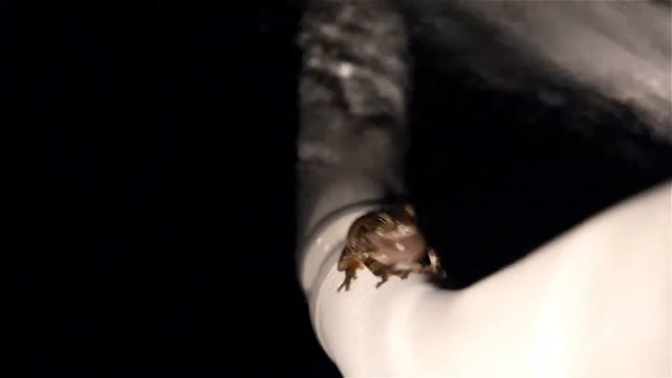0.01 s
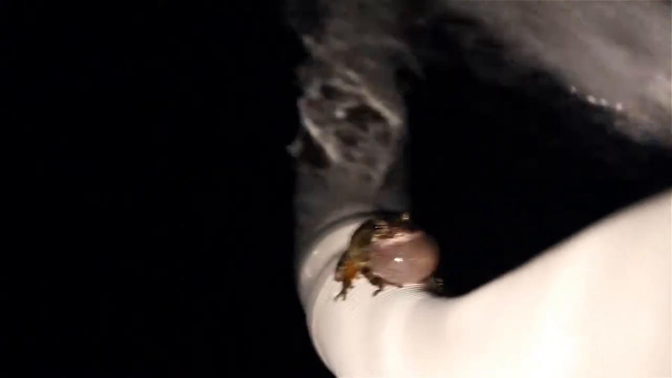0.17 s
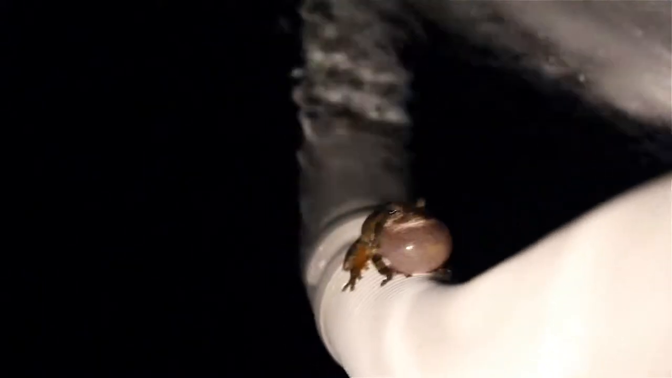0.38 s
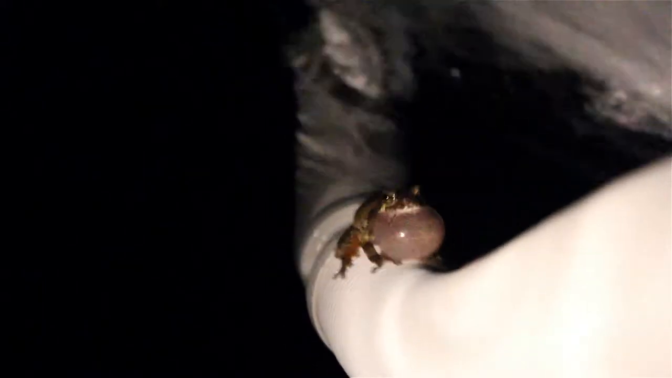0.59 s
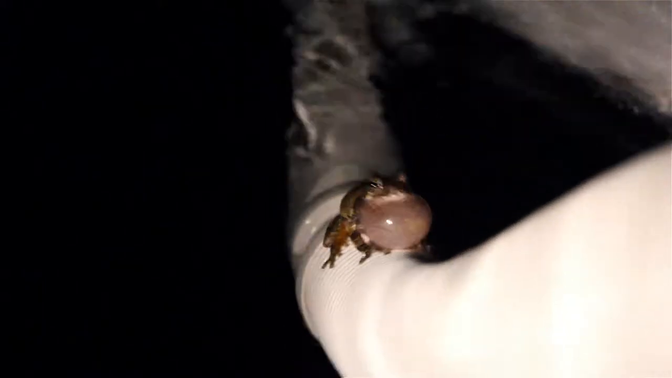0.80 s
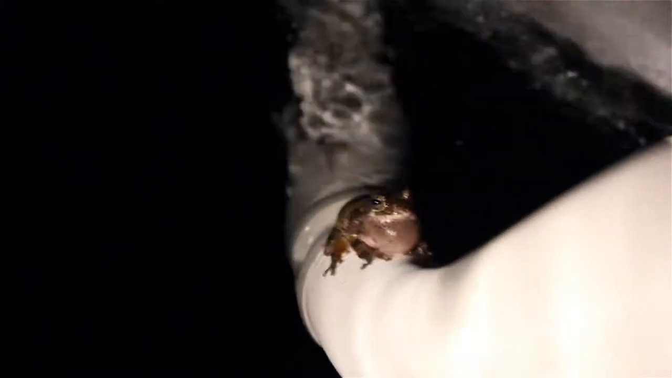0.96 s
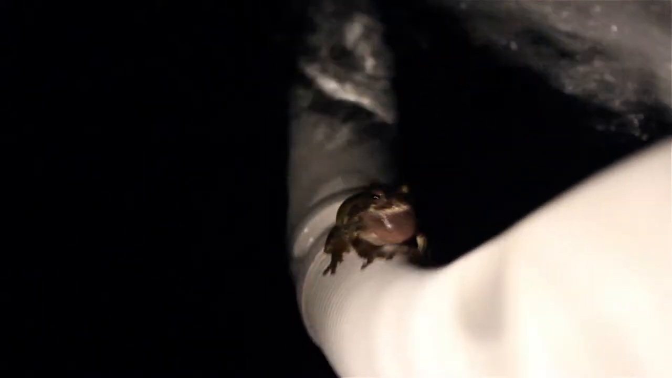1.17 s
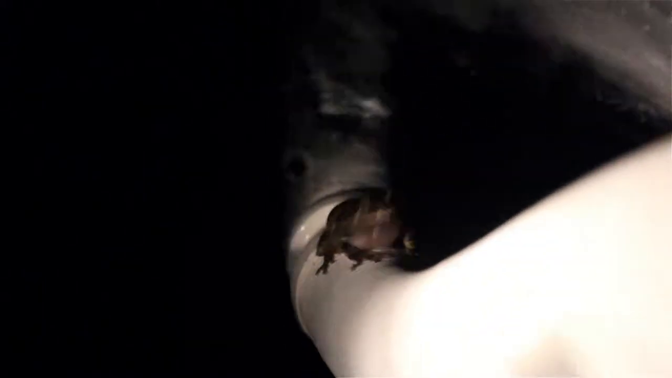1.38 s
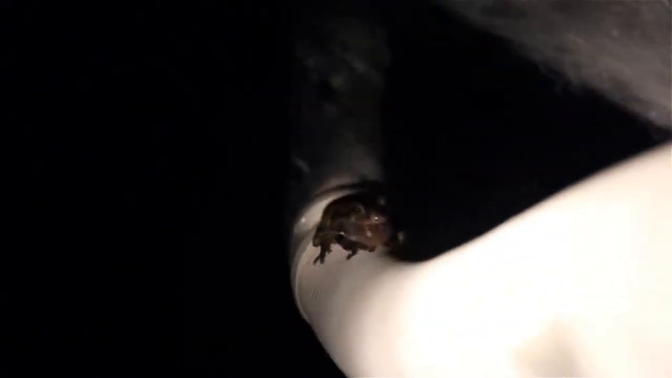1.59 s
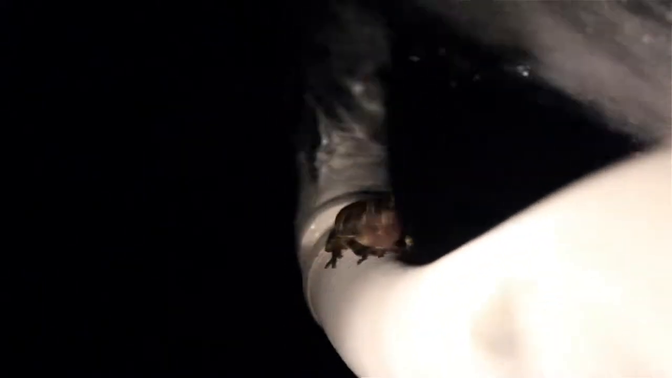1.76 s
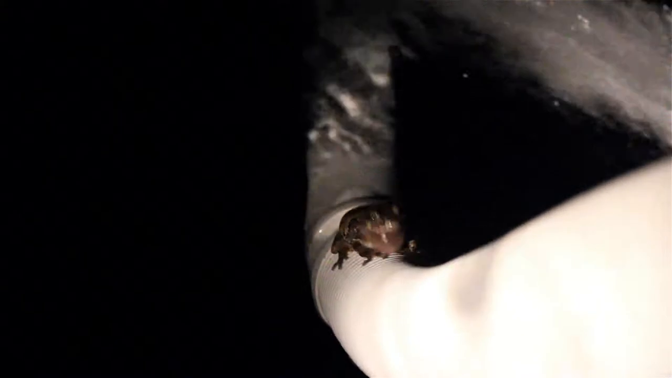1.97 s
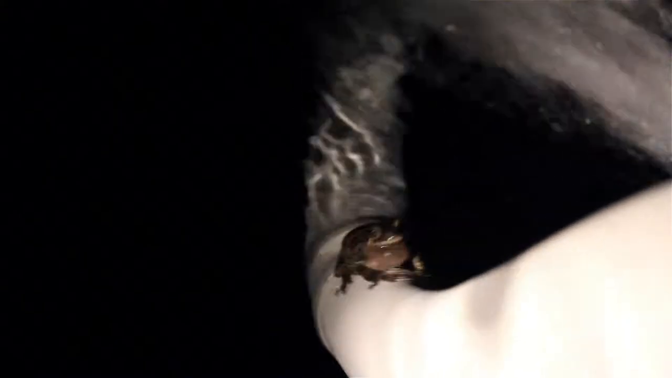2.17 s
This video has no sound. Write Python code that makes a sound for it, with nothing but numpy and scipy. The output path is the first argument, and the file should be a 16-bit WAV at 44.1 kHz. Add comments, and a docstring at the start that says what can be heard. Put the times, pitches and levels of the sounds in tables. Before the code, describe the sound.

Outdoors at night, two tree frogs' croaks overlap: a fainter, slower doubled rattle begins, a bright close trill bursts over it and stops first, leaving soft hiss, low hum, light ticks and hollow taps.

```python
"""Outdoors at night, a tree frog close to the microphone gives one rattling croak over hiss and a faint low hum.
Its croak is a train of about 48 short rising chirps a second, strongest at the octave: harmonics swept
through the resonance of a vocal sac. A second frog farther off starts earlier and ends later, with slower,
doubled pulses. Body resonances and short echoes draw both out. The night is shaped noise and sine tones;
soft knocks are decaying sines with a puff of noise, and ticks are brief bands of noise."""
import sys
import numpy as np
from scipy import signal
from scipy.fft import rfft, irfft, next_fast_len
from scipy.io import wavfile
from scipy.ndimage import uniform_filter1d, map_coordinates

SR = 44100
rng = np.random.default_rng(int(sys.argv[2]) if len(sys.argv) > 2 else 0)


def output_pcm(signal):
    """Save a mono or channel-first signal as 16-bit PCM at the path in sys.argv[1].

    Samples are clipped to [-1, 1] before scaling.
    """
    pcm = np.clip(np.atleast_2d(signal).T, -1, 1) * 32767
    wavfile.write(sys.argv[1], SR, np.round(pcm).astype(np.int16))


N = 97020  # samples: 2.2 s


def amp(db):
    """Decibels to gain."""
    return 10 ** (np.asarray(db) / 20)


def unit(x):
    """Scale to rms 1."""
    return x / np.sqrt(np.mean(x ** 2) + 1e-20)


def along(points, hz):
    """Read a curve of (Hz, value) points on a log frequency axis."""
    point_hz, value = np.transpose(points)
    return np.interp(np.log(hz + 1), np.log(point_hz + 1), value)


def wobble(rate):
    """A smooth random curve with rate knots a second."""
    knots = rng.standard_normal(int(N * rate / SR) + 4)
    return map_coordinates(knots, [np.arange(N) * rate / SR])


def filtered(x, response):
    """Multiply the spectrum of x by a response of frequency."""
    size = next_fast_len(len(x) + SR // 4)
    spectrum = rfft(x, size) * response(np.fft.rfftfreq(size, 1 / SR))
    return irfft(spectrum, size)[:len(x)]


def add(track, start, sound):
    """Mix a sound into the track from a start sample on."""
    part = track[start:start + len(sound)]
    part += sound[:len(part)]


# Colour of the hiss. Each row: frequency in Hz, relative density in dB per Hz.
AIR = [(25, -29), (40, -24), (64, -14), (95, -17), (125, -12), (150, -12), (215, -6.5), (270, -7.5),
       (390, -10.5), (470, -7.5), (590, -1.5), (1060, -4.5), (1630, -2), (2300, -7), (3380, -7),
       (4700, -12), (7000, -18.5), (10500, -24), (14500, -26.5), (15700, -24.5)]
# Loudness of the hiss. Each row: time in seconds, rms level in dB.
AIR_LEVEL = [(0, -39), (.2, -39), (1.35, -39), (1.7, -39.5), (2.2, -39.5)]
# Tones of the hum. Each row: frequency in Hz, rms level in dB.
HUM = [(120, -62.5), (294, -59.5), (360, -71), (419, -63.5)]


def night(patchy_db, waver):
    """Noise with slight patches in time and pitch makes the hiss; sines with a drifting phase make the hum."""
    t = np.arange(N) / SR
    cells = signal.stft(rng.standard_normal(N), nperseg=512)[2]
    patches = uniform_filter1d(rng.standard_normal(cells.shape), size=8, axis=0)  # across pitch
    patches = uniform_filter1d(patches, size=5, axis=1)  # across time
    hiss = signal.istft(cells * amp(patchy_db * unit(patches)), nperseg=512)[1][:N]
    hiss = unit(filtered(hiss, lambda hz: amp(along(AIR, hz))))
    hiss *= amp(np.interp(t, *np.transpose(AIR_LEVEL)))
    hum = np.zeros(N)
    for hz, db in HUM:
        phase = 2 * np.pi * hz * t + waver * wobble(6.1)
        hum += np.sqrt(2) * amp(db) * np.sin(phase)
    return hiss + hum


def puff(hz, width, size):
    """A band of noise at rms 1: a bell around hz, width in octaves."""
    noise = rng.standard_normal(size)
    return unit(filtered(noise, lambda f: np.exp(-.5 * (np.log2((f + 1) / hz) / width) ** 2)))


# Soft hollow knocks.
# Each row: start in seconds, level in dB before a doubling of gain, pitch in Hz, 60 dB decay in seconds.
KNOCKS = [(.035, -35.5, 705, 0.036), (1.131, -35, 566, 0.062), (1.159, -32.5, 556, 0.067),
          (1.266, -35, 1410, 0.026), (1.478, -28.5, 1550, 0.024), (1.76, -40, 556, 0.15)]
KNOCK_RISE_S, KNOCK_PUFF_DB, KNOCK_WIDTH = 0.0032, -6.5, 0.37  # width in octaves


def knocks():
    """Each knock is one decaying mode with a slightly higher puff of noise."""
    out, t = np.zeros(N), np.arange(SR // 6) / SR
    for s, db, hz, t60 in KNOCKS:
        body = np.sin(2 * np.pi * hz * t) + amp(KNOCK_PUFF_DB) * puff(1.22 * hz, KNOCK_WIDTH, len(t))
        envelope = amp(db - 60 * t / t60) * (1 - np.exp(-t / KNOCK_RISE_S))
        add(out, round(s * SR), envelope * body * 2)
    return out


# Faint ticks. Each row: start in seconds, level in dB, centre in Hz.
TICKS = [(.259, -42, 14300), (.615, -36, 15000), (.634, -35, 6550), (.652, -37, 12000), (1.132, -28, 2480),
         (1.46, -37, 7700), (1.714, -31.5, 4200), (1.821, -38, 10500), (1.855, -33, 5160),
         (1.884, -44, 12500), (1.991, -32.5, 5600), (2.002, -40, 9500), (2.072, -33.5, 3300)]
TICK_RISE_S, TICK_T60_S, TICK_WIDTH = 0.0014, 0.02, 0.19  # width in octaves
CRACKLE_PER_S, CRACKLE_DB, CRACKLE_SPREAD_DB, CRACKLE_HZ = 22, -45, 2.5, 9000


def ticks_and_crackle():
    """Placed ticks are short bands of noise; a crackle of fainter, broader ones falls at random moments."""
    out, t = np.zeros(N), np.arange(SR // 6) / SR
    envelope = amp(-60 * t / TICK_T60_S) * (1 - np.exp(-t / TICK_RISE_S))
    for s, db, hz in TICKS:
        add(out, round(s * SR), amp(db) * envelope * puff(hz, TICK_WIDTH, len(t)))
    for when, size, colour in rng.random((int(CRACKLE_PER_S * N / SR), 3)):
        hz = CRACKLE_HZ * 2 ** (colour - .5)  # half an octave either way
        gain = amp(CRACKLE_DB + CRACKLE_SPREAD_DB * size)
        add(out, int(when * N), gain * envelope * puff(hz, 2 * TICK_WIDTH, len(t)))
    return out


def pulse_times(rate):
    """A pulse falls whenever the running sum of the rate passes a whole number."""
    s, per_s = np.transpose(rate)
    t = np.arange(s[0], s[-1], 1 / SR)
    count = np.cumsum(np.interp(t, s, per_s)) / SR
    return np.interp(np.arange(int(count[-1]) + 1), count, t)


# What the vocal sac radiates. Each row: frequency in Hz, gain in dB.
SAC = [(1050, -18), (1250, -13), (1450, 3), (2100, -1), (2450, -1.5), (2750, -2), (3300, -34.5),
       (3800, -26.5), (4700, -35.5), (6000, -42), (7900, -43.5), (8400, -40.5), (9000, -48), (12000, -48)]
JITTER_S, SCATTER_DB, PITCH_SCATTER = .00005, 0.23, 0.008  # pulse to pulse; pitch as a fraction
ROUGH = 0.11  # depth of the fast random flutter in level
FLATNESS = 3.6  # how square the top of a pulse is (2 = bell)


def chirps(times, effort, attack, release, glide, bend, pitch=1, order=8):
    """Each pulse is a flat-topped upward glide whose harmonics sweep through the vocal sac."""
    s, level, hz, fundamental_db = np.transpose(effort)
    out = np.zeros(N)
    harmonic = np.arange(1, order + 1)[:, None]
    for at, chance in zip(times, rng.standard_normal((len(times), 3))):
        start = int((at - 2 * attack) * SR)
        samples = np.arange(int(2 * (attack + release) * SR))
        t = (start + samples) / SR - at - JITTER_S * chance[0]  # zero at mid-pulse
        middle_hz = pitch * np.interp(at, s, hz) * (1 + PITCH_SCATTER * chance[1])
        f = middle_hz * 2 ** (glide * t + bend * t * t)
        phase = 2 * np.pi * np.cumsum(f) / SR
        phase -= np.interp(0, t, phase)
        swell = np.exp(-np.abs(t / np.where(t < 0, attack, release)) ** FLATNESS)
        lift_db = (harmonic == 1) * np.interp(at, s, fundamental_db)
        partials = amp(along(SAC, harmonic * f) + lift_db) * np.sin(harmonic * phase)
        gain = amp(np.interp(at, s, level) + SCATTER_DB * chance[2])
        add(out, start, gain * swell * partials.sum(0))
    return out * (1 + ROUGH * wobble(900))


# Pace of the far croak. Each row: time in seconds, pulses a second.
FAR_RATE = [(.152, 49.3), (.25, 48.62), (.45, 46.65), (1.0, 44.29), (1.125, 41.99)]
# Effort through the far croak.
# Each row: time in seconds, level in dB, mid-pulse pitch in Hz before scatter and the twin's
# pitch ratio, lift of the fundamental in dB.
FAR_EFFORT = [(.152, -42.5, 1100, 22), (.19, -30.5, 1160, 13), (.22, -23.5, 1188, 6), (.35, -20, 1170, 2),
              (.7, -19.5, 1195, 0), (1.0, -20, 1195, 0.5), (1.11, -20, 1178, 1)]
# Shape of the first pulse: attack before its middle and release after it in seconds,
# glide in octaves a second, bend of the glide in octaves a second squared.
FAR_PULSE = dict(attack=0.0041, release=0.0032, glide=42.6, bend=1600)
# Shape of the twin: the same fields, and pitch as a ratio.
TWIN_PULSE = dict(attack=0.0038, release=0.0029, glide=17.4, bend=1800, pitch=0.97)
# The twin against the first pulse. Each row: time in seconds, relative level in dB.
DOUBLE_LEVEL = [(.2, -2.5), (1.0, 0.5)]
DOUBLE_S = .0093  # delay of the twin


def far_frog():
    """A softer train in which every pulse is followed by a flatter twin."""
    times = pulse_times(FAR_RATE)
    twin = chirps(times + DOUBLE_S, FAR_EFFORT, **TWIN_PULSE)
    twin_db = np.interp(np.arange(N) / SR, *np.transpose(DOUBLE_LEVEL))
    return chirps(times, FAR_EFFORT, **FAR_PULSE) + amp(twin_db) * twin


# Pace of the near croak. Each row: time in seconds, pulses a second.
NEAR_RATE = [(.274, 54.01), (.32, 50.05), (.55, 48.23), (.86, 47.41), (.905, 44.49), (.945, 32.35)]
# Effort through the near croak.
# Each row: time in seconds, level in dB, mid-pulse pitch in Hz before scatter, lift of the fundamental in dB.
NEAR_EFFORT = [(.274, -22, 1168, 5), (.315, -12.5, 1230, -2), (.37, -11.5, 1236, -2.5), (.55, -9, 1224, -3),
               (.615, -11.5, 1240, -1), (.645, -10, 1249, -4.5), (.68, -10, 1233, -1.5),
               (.78, -10.5, 1243, -3), (.84, -11, 1232, -1), (.94, -10.5, 1247, -1.5)]
# Shape of a pulse: attack before its middle and release after it in seconds,
# glide in octaves a second, bend of the glide in octaves a second squared.
NEAR_PULSE = dict(attack=.0034, release=0.003, glide=40.6, bend=2300)


def near_frog():
    """One loud train of single pulses that slows at its end."""
    return chirps(pulse_times(NEAR_RATE), NEAR_EFFORT, **NEAR_PULSE)


# Resonances that ring on after a pulse. Each row: frequency in Hz, width in Hz, level in dB.
RINGS = [(1189, 77, -12), (8530, 180, 10)]


def ringing(x):
    """Narrow resonances of the body draw out each pulse."""
    def response(f):
        return sum(amp(db) * 1j * f * width / (hz * hz - f * f + 1j * f * width) for hz, width, db in RINGS)
    return x + filtered(x, response)


# Echoes off nearby surfaces. Each row: frequency in Hz, 60 dB decay in seconds.
SPACE = [(500, .12), (1200, 0.17), (2400, 0.056), (8000, .05)]
# Loudness of the echoes. Each row: frequency in Hz, level in dB.
WET = [(500, -26), (1250, -5), (2400, -11), (4000, -22), (8500, -9)]


def echoes(x):
    """Decaying noise makes a short diffuse tail, longest near the frogs' fundamental."""
    hz, t, cells = signal.stft(rng.standard_normal(SR // 4), SR, nperseg=256)
    t60 = along(SPACE, hz)[:, None]
    decay = amp(-60 * t / t60)
    decay /= np.sqrt((decay ** 2).sum(1, keepdims=True) * (t[1] * SR))  # equal energy in every band
    tail = signal.istft(cells * decay * amp(along(WET, hz))[:, None], SR, nperseg=256)[1]
    return signal.fftconvolve(x, tail)[:N]


def scene():
    """Both frogs with their echoes, over the night and its small sounds."""
    background = night(patchy_db=1.2, waver=0.28)  # waver in radians
    small_sounds = knocks() + ticks_and_crackle()
    frogs = ringing(far_frog() + near_frog())
    return (frogs + echoes(frogs) + background + small_sounds)[None]


def record(dry):
    """The recorder keeps nothing from its band limit of 15.8 kHz upward."""
    return filtered(dry[0], lambda hz: hz < 15800)[None]


dry = scene()
out = record(dry)
output_pcm(out)
```